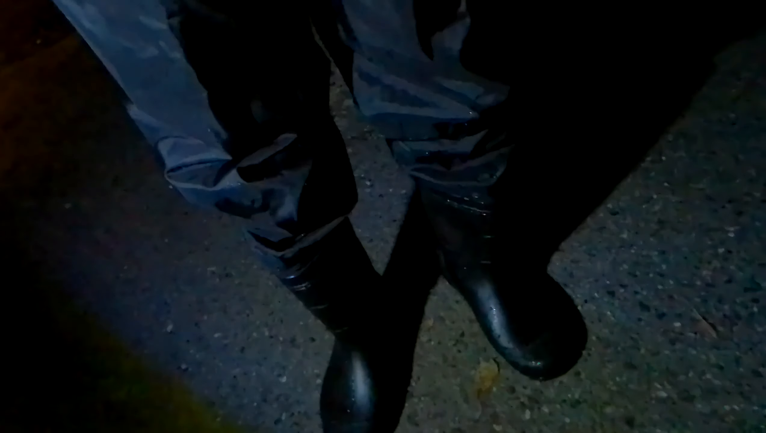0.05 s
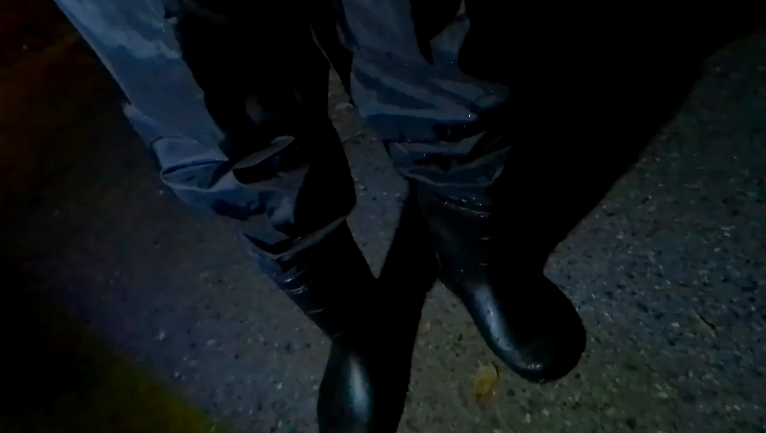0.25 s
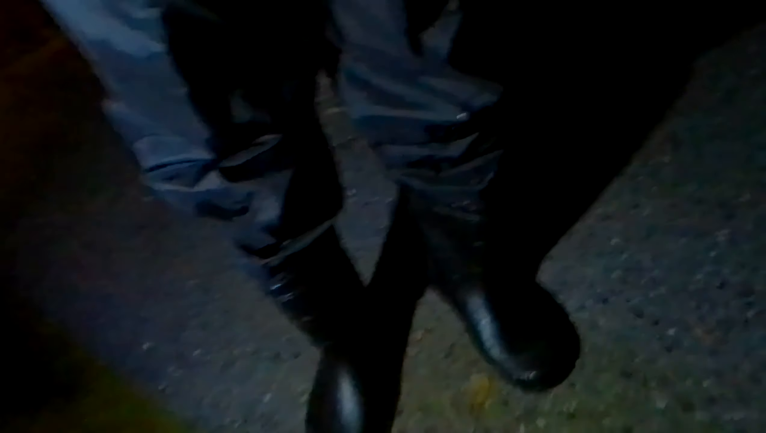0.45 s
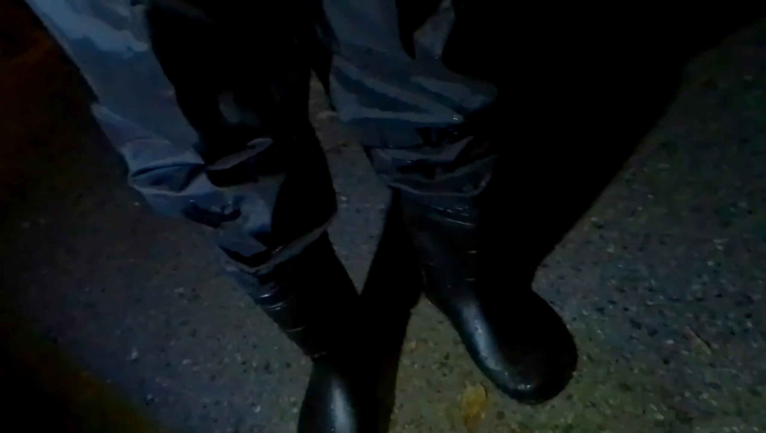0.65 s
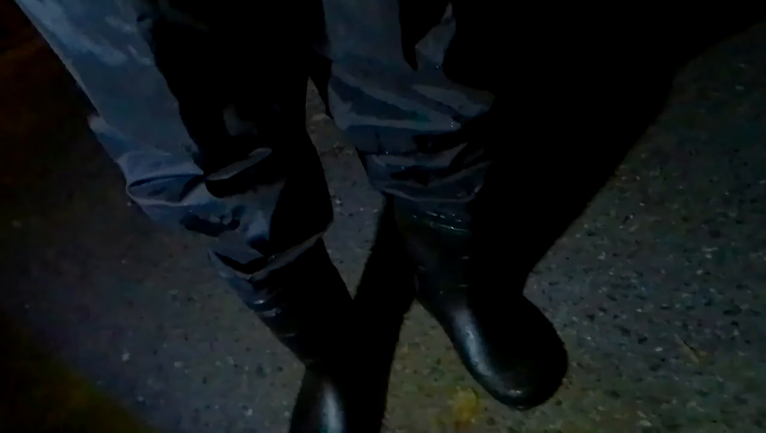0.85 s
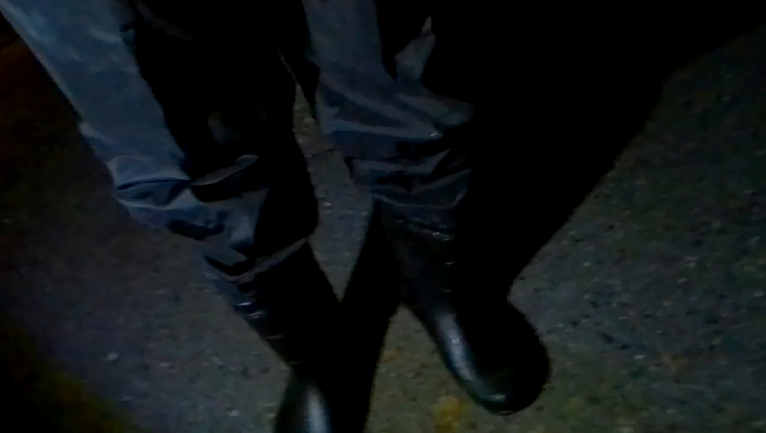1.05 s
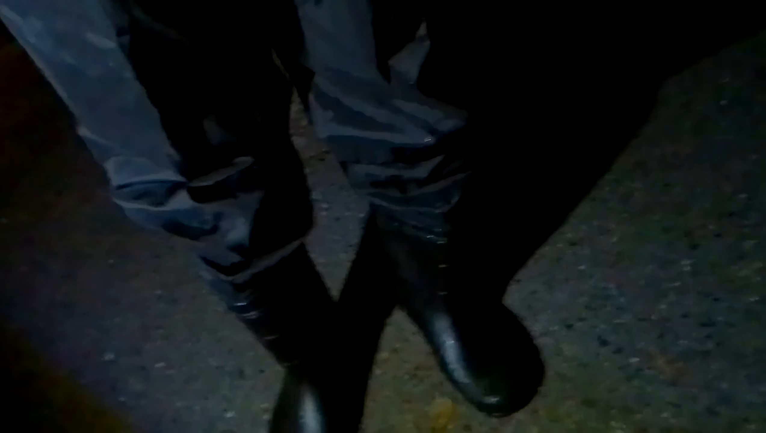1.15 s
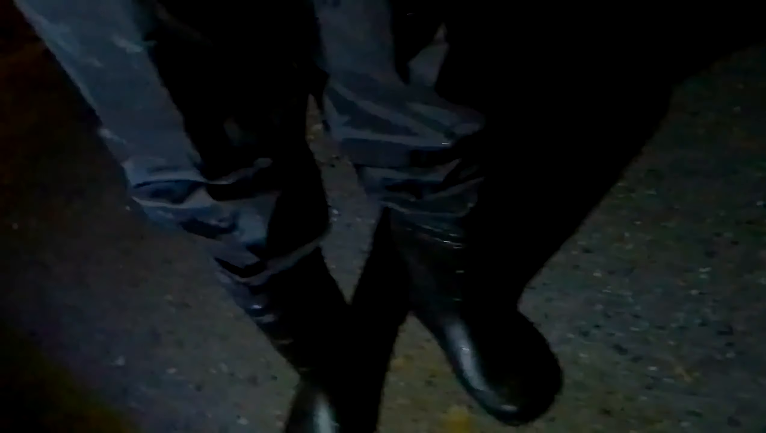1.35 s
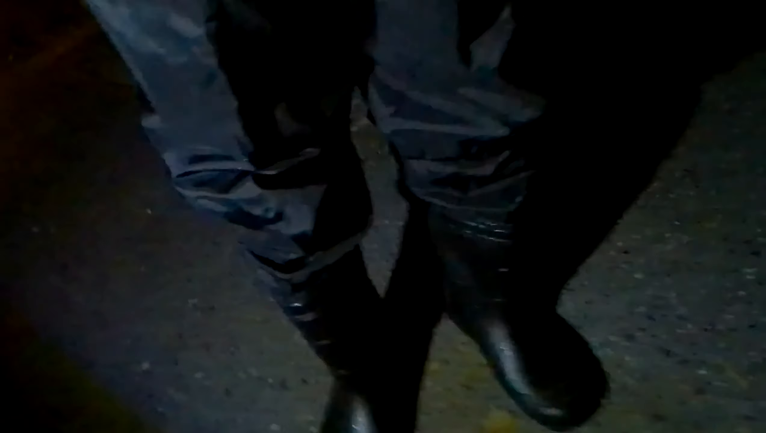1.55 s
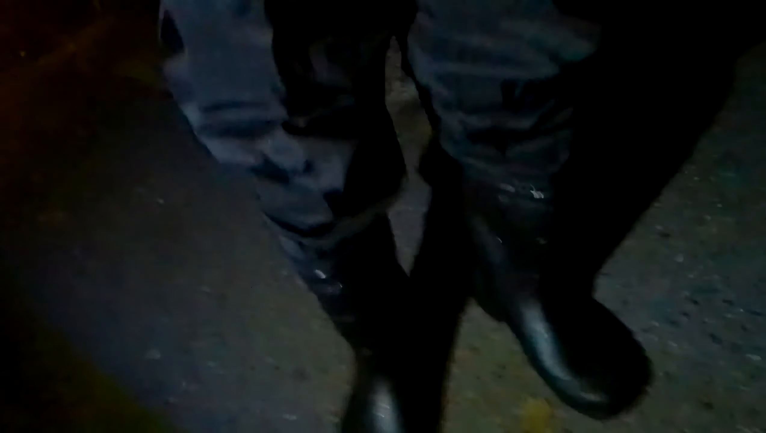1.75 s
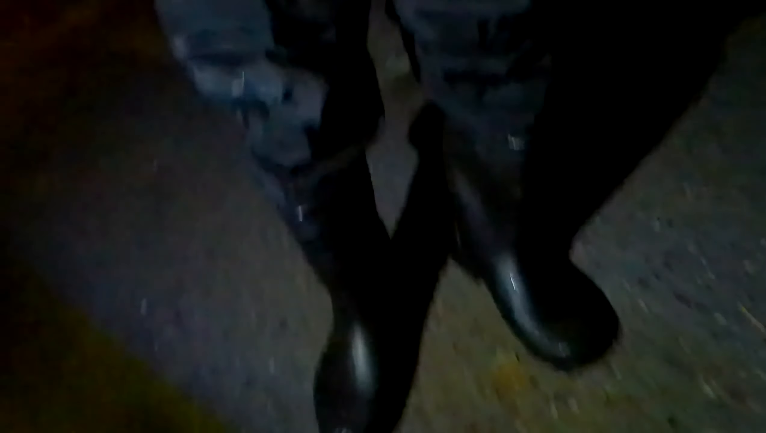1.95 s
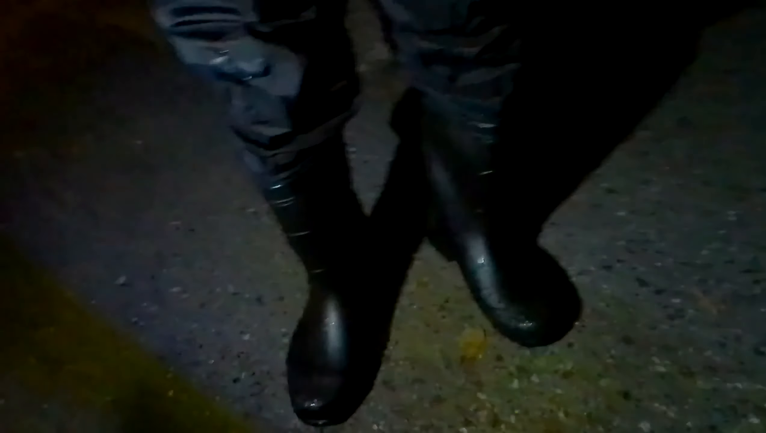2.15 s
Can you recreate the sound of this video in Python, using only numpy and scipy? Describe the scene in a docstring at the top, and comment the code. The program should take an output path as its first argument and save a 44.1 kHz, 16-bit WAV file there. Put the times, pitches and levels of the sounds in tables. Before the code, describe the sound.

Close handling noise on a small plastic camera, over faint steady night hiss. A catch snaps sharply at 0.25 seconds. Fingers rub softly on the case until 1.5 seconds, with a light tick near 1 second. Then a knock starts a scraping slide with a rising rubbery squeak, lasting to 1.8. A sharp click, a few smaller ones and a low bump follow, fading by 2 seconds.

```python
"""Faint night hiss and a light touch of fingers come first, then a catch snaps on a hand-held camera.
Fingers shift softly on the case. The grip slides, sticking and slipping in a rising rubbery squeak,
and ends in a few clicks while the hand rocks the camera. Every rub and knock rings the same small
plastic case, with a quiet street behind it."""
import sys
import numpy as np
from scipy import signal
from scipy.fft import rfft, irfft
from scipy.io import wavfile
from scipy.ndimage import uniform_filter1d

SR = 44100
rng = np.random.default_rng(int(sys.argv[2]) if len(sys.argv) > 2 else 0)


def unload_audio(sound):
    """Save the sound as a 16-bit wav file, at the path given as the first command line argument."""
    columns = np.transpose(np.atleast_2d(sound))
    # keep every value between -1 and 1, then stretch to whole-number steps
    steps = np.round(np.clip(columns, -1, 1) * 32767)
    wavfile.write(sys.argv[1], SR, steps.astype(np.int16))


N = 97020  # 2.2 seconds

# Tone of the night air and microphone hiss (frequency [Hz], relative level [dB])
HISS_SPECTRUM = [(30, 7), (70, -11), (150, -14), (400, -24), (1000, -28.5), (2000, -34.5), (3000, -36.5),
                 (3700, -20.5), (4300, -29.5), (4800, -35), (5600, -32.5), (7000, -43), (11000, -43.5)]
# Rocking moves of the hand (start [s], length [s], level [dB])
HAND_SWAYS = [(1.749, 0.017, -41.5), (1.876, 0.13, -33)]

# A mode is a tone that an object rings at when it is tapped.
# Modes of the plastic case (frequency [Hz], relative level [dB], time to fade by 60 dB [s])
CASE_MODES = [(436, -42, 0.11), (509, -31.5, 0.085), (626, -27, 0.088), (974, -39.5, 0.048),
              (1021, -38, 0.082), (1123, -26.5, 0.049), (1229, -30.5, .05), (1330, -24.5, 0.021),
              (1527, -19, 0.035), (1861.6, -29, 0.055), (2491, -29, 0.046), (2775, -36, 0.028),
              (3137, -31.5, 0.025), (3444, -31, 0.024), (4012, -30.5, 0.036), (4330, -30.5, 0.021),
              (4780, -27, .025), (5670, -37, .022), (6370, -44, .02), (6760, -42, 0.017),
              (7986, -52, 0.015), (9930, -48.5, .018), (10500, -48, 0.012)]
# Modes of the catch (frequency [Hz], relative level [dB], time to fade by 60 dB [s])
CATCH_MODES = [(1453.4, 0, 0.022), (1393, -20.5, .15), (1693, -29.5, 0.11), (1843, -43, .3)]
# Dull modes of the hand and arm holding the camera (frequency [Hz], relative level [dB], time to fade by 60 dB
# [s])
THUMP_MODES = [(101, -3.5, 0.14), (179, -4, 0.11), (232, -2.5, 0.075)]

# Soft finger strokes (start [s], length [s], rasp level [dB], hollow level [dB], rumble level [dB])
FINGER_STROKES = [(.005, 0.032, -71.5, -65, -71.5), (0.217, 0.027, -71.5, -62.5, -53),
                  (0.352, 0.076, -61, -65.5, -72), (0.465, 0.079, -64, -63, -74),
                  (0.734, 0.078, -59, -76.5, -67), (0.792, 0.12, -57, -62, -60),
                  (0.901, 0.071, -49.5, -79, -84), (1.021, 0.075, -69, -75, -65.5),
                  (1.227, 0.075, -63.5, -77.5, -75), (1.325, 0.11, -59, -78, -80.5),
                  (1.43, 0.22, -52, -74, -59.5), (1.775, 0.11, -43, -56.5, -46.5),
                  (1.876, 0.12, -50, -48.5, -50.5), (1.954, 0.096, -80, -77.5, -59),
                  (2.125, 0.071, -76, -84, -75)]
# One row each for a stroke's rasp, hollow tone and rumble (low edge [Hz], high edge [Hz])
STROKE_BANDS_HZ = [(915.6, 1520), (372.1, 720), (90, 207)]
# Snaps and clicks (time [s], case gain [dB], case dulled above [Hz], catch gain [dB], thump gain [dB])
KNOCK_EVENTS = [(.2490, -3.5, 3670, -2.5, -25), (0.9536, -23, 1185, -37, -59),
                (1.0480, -28.5, 650, -70, -51.5), (1.5280, -11, 1880, -26, -31),
                (1.8318, -1, 11600, -26.5, -32), (1.8855, -10, 4960, -15.5, -63.5),
                (1.9255, -20.5, 2050, -23.5, -73), (1.9512, -21, 2020, -24, -67)]

# Loudness of the slide (time [s], scrape level [dB], squeak level [dB], level one octave up [dB])
SLIDE_LEVELS = [(1.522, -60, -80, -70), (1.532, -37.5, -58, -71), (1.58, -36.5, -35.5, -58),
                (1.613, -32.5, -24.5, -36.5), (1.64, -31, -35.5, -29.5), (1.675, -29.5, -34, -45.5),
                (1.705, -28, -45.5, -37), (1.735, -39, -40, -56), (1.755, -36, -39, -69.5),
                (1.81, -62, -82, -71)]
# Pitch of the squeak as the slide speeds up (time [s], pitch [Hz])
SQUEAK_PITCH = [(1.53, 461.9), (1.58, 469.6), (1.612, 546), (1.645, 652.6), (1.675, 796), (1.692, 926),
                (1.712, 900), (1.735, 1185), (1.76, 1223)]
# Tone of the sliding scrape (frequency [Hz], relative level [dB])
SCRAPE_SPECTRUM = [(80, -2.5), (300, -2.5), (520, 4), (640, -3.5), (850, 6), (1150, -0.5), (1500, -6.5),
                   (1900, -10), (2300, -0.5), (2600, -12), (3200, -26.5), (4700, -42), (6500, -37),
                   (11000, -41.5)]


def amp(db):
    """Turns decibels into a number to multiply by."""
    return 10 ** (np.asarray(db) / 20)


def unit(x):
    """Scales a sound so that its average strength (rms) is 1."""
    return x / np.sqrt(np.mean(x ** 2) + 1e-20)


def add(mix, start_s, sound):
    """Adds a sound to the mix at the given time."""
    part = mix[max(round(start_s * SR), 0):][:len(sound)]
    part += sound[:len(part)]


def curve(table, column=1):
    """Joins the values in one column with straight lines over time."""
    rows = np.array(table)
    return np.interp(np.arange(N) / SR, rows[:, 0], rows[:, column])


def colour(x, spectrum):
    """Turns each frequency up or down to follow a spectrum table."""
    hz, db = np.transpose(spectrum)
    gain_db = np.interp(np.log(np.fft.rfftfreq(N, 1 / SR) + 1), np.log(hz), db)
    return irfft(rfft(x) * amp(gain_db), N)


def band(x, edges_hz, order=3):
    """Keeps the sound between two frequencies and scales it to strength 1."""
    return unit(signal.sosfilt(signal.butter(order, edges_hz, "band", fs=SR, output="sos"), x))


def ring(modes, rise_s=0):
    """A tapped object rings: one fading tone per mode, every second one flipped upside down."""
    t = np.arange(SR // 2) / SR
    sound = sum((-1) ** k * amp(db - 60 * t / fade_s) * np.sin(2 * np.pi * hz * t)
                for k, (hz, db, fade_s) in enumerate(modes))
    return sound * (1 - np.exp(-t / rise_s)) ** 2 if rise_s else sound


def night_hiss(level_db=-64):
    """Night air and the microphone make a faint, steady hiss."""
    return amp(level_db) * unit(colour(rng.standard_normal(N), HISS_SPECTRUM))


def hand_sway(sway_hz=21.23):
    """The hand rocks the camera, pushing slow waves of pressure onto the microphone."""
    out = np.zeros(N)
    for start, length, db in HAND_SWAYS:
        t = np.arange(0, length, 1 / SR)
        swell = np.sin(np.pi * t / length) ** 2
        add(out, start, -amp(db) * swell * np.sin(2 * np.pi * sway_hz * t))
    return out


def friction(slips_per_s=2200, spread_db=2):
    """Rubbing is a stream of tiny slips of uneven size, and each one rings the case."""
    size = amp(spread_db * np.minimum(rng.exponential(1, N), 4))
    slips = size * rng.choice([-1, 1], N) * (rng.random(N) < slips_per_s / SR)
    return signal.fftconvolve(slips, ring(CASE_MODES))[:N]


def finger_strokes(attack_s=0.018, release_s=0.042):
    """Fingers creep over the case: a rasp, a hollow tone and a rumble swell and fade together."""
    out, t = np.zeros(N), np.arange(N) / SR
    rub = friction()
    layers = np.array([band(rub, edges) for edges in STROKE_BANDS_HZ])
    layers[0] += amp(-28) * band(rub, (2260, 2565))  # a thin overtone on the rasp
    for start, length, *levels_db in FINGER_STROKES:
        fade_in = (t - start) / attack_s
        fade_out = (start + length - t) / release_s
        press = np.clip(np.minimum(fade_in, fade_out), 0, 1)
        out += press * (amp(levels_db) @ layers)
    return out


def knocks(crunch_s=.004, rattle_fade_s=.15):
    """Each blow rings the case and the catch, and the holding hand and arm give a dull thump."""
    out, t = np.zeros(N), np.arange(SR // 2) / SR
    for start, case_db, dull_hz, catch_db, thump_db in KNOCK_EVENTS:
        crunch, rattle = rng.standard_normal((2, len(t)))
        force = .08 * crunch * np.exp(-t / crunch_s)
        force[0] = 1  # one sharp push leads the short crunch
        case = signal.fftconvolve(force, ring(CASE_MODES))[:len(t)]
        after_ring = band(rattle, (355.3, 1667), order=4) * amp(-37.5 - 60 * t / rattle_fade_s)
        dulled = signal.lfilter(*signal.butter(5, dull_hz, fs=SR), case + after_ring)
        add(out, start, amp(case_db) * dulled)
        add(out, start, amp(catch_db) * ring(CATCH_MODES, rise_s=.0007))
        add(out, start, amp(thump_db) * ring(THUMP_MODES, rise_s=.012))
    return out


def grip_slide(jitter_depth=.014, flutter_depth=.25, fizz_db_per_octave=11.5):
    """The grip scrapes, sticks and slips. As it speeds up, its squeak climbs and a fizz grows."""
    t = np.arange(N) / SR
    moving = (t > SLIDE_LEVELS[0][0]) & (t < SLIDE_LEVELS[-1][0])
    fade = uniform_filter1d(moving.astype(float), size=256)  # softens the start and the stop
    jitter, flutter = (band(noise, (20, 120)) for noise in rng.standard_normal((2, N)))
    pitch_hz = curve(SQUEAK_PITCH)
    phase = 2 * np.pi * np.cumsum(pitch_hz * (1 + jitter_depth * jitter)) / SR  # the pitch trembles
    tone = amp(curve(SLIDE_LEVELS, column=2)) * unit(np.sin(phase))
    octave = amp(curve(SLIDE_LEVELS, column=3)) * unit(np.sin(2 * phase))
    squeak = (tone + octave) * (1 + flutter_depth * flutter)  # so does the loudness
    rub = friction()
    fizz_db = -24 + fizz_db_per_octave * np.log2(pitch_hz / pitch_hz.max())  # relative to the scrape
    fizz = amp(fizz_db) * band(rub, (3170, 4950))
    scrape = amp(curve(SLIDE_LEVELS, column=1)) * (unit(colour(rub, SCRAPE_SPECTRUM)) + fizz)
    return fade * (scrape + squeak)


def scene():
    """All the sounds add up at one microphone."""
    return (knocks() + finger_strokes() + grip_slide() + hand_sway() + night_hiss())[None]


def record(dry, cutoff_hz=11700):
    """The camera cuts off the highest treble."""
    low_pass = signal.firwin(255, cutoff_hz, window=("kaiser", 8), fs=SR)
    return signal.oaconvolve(dry, low_pass[None], "same")


dry = scene()
out = record(dry)
unload_audio(out)
```